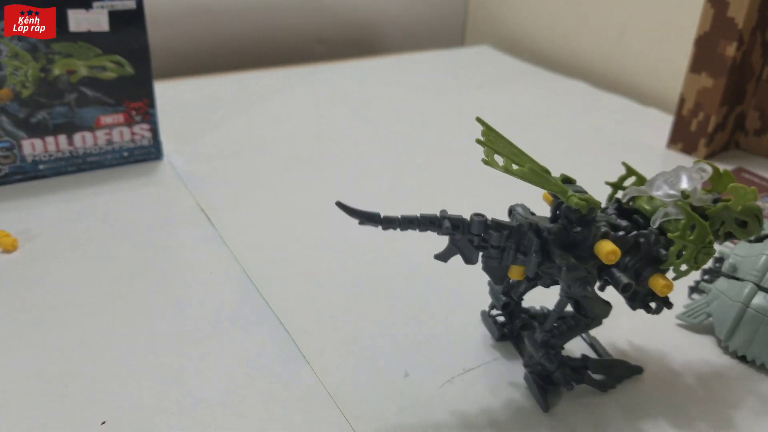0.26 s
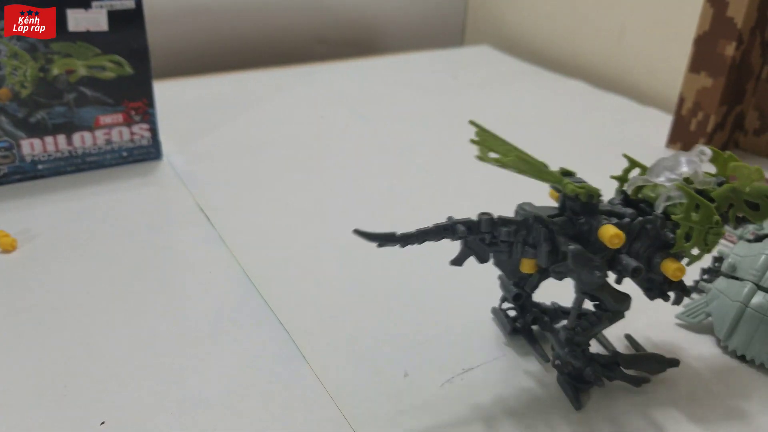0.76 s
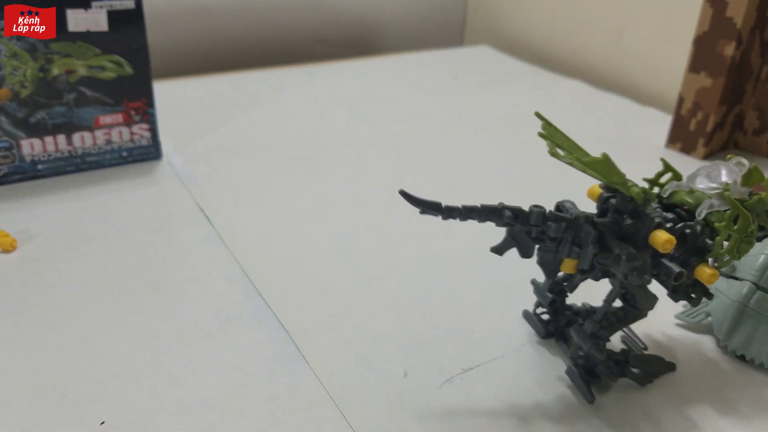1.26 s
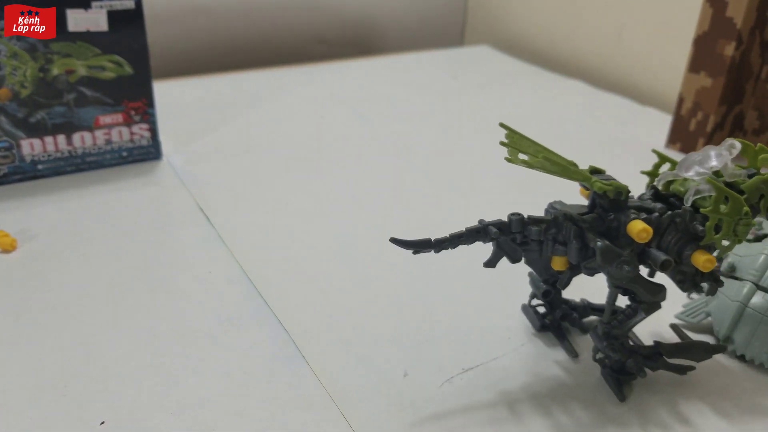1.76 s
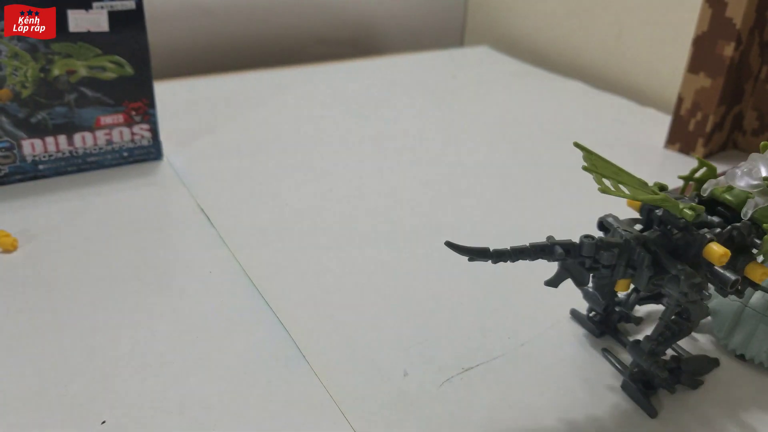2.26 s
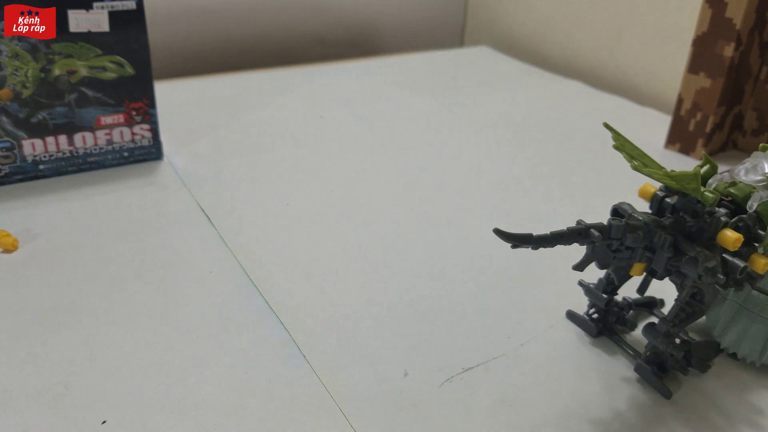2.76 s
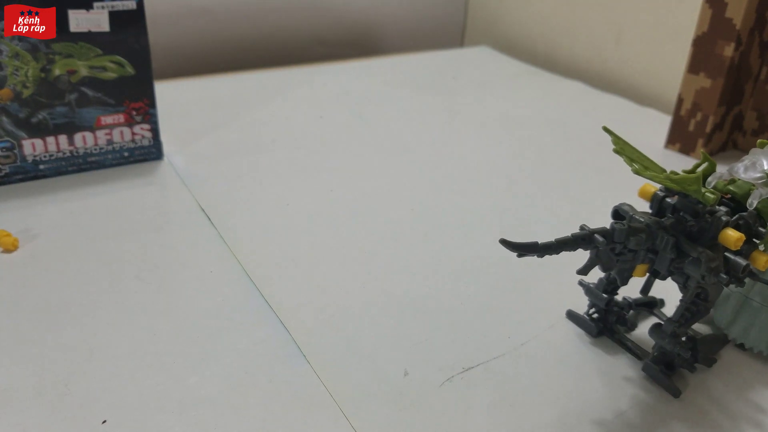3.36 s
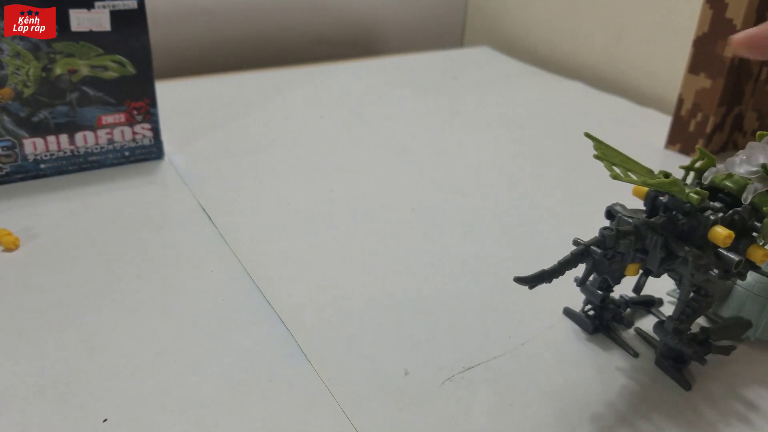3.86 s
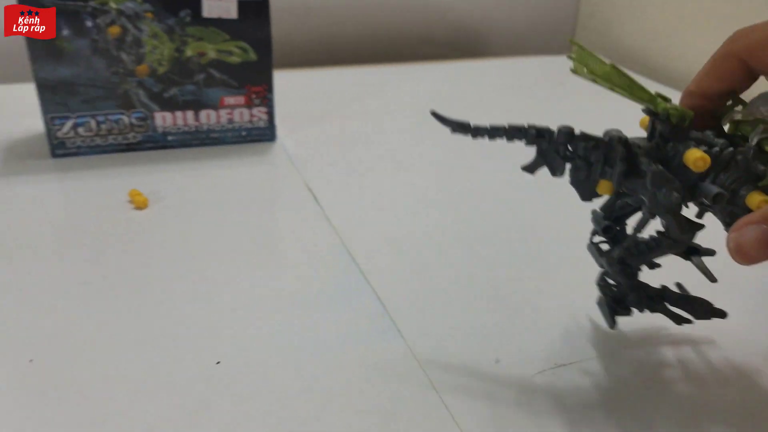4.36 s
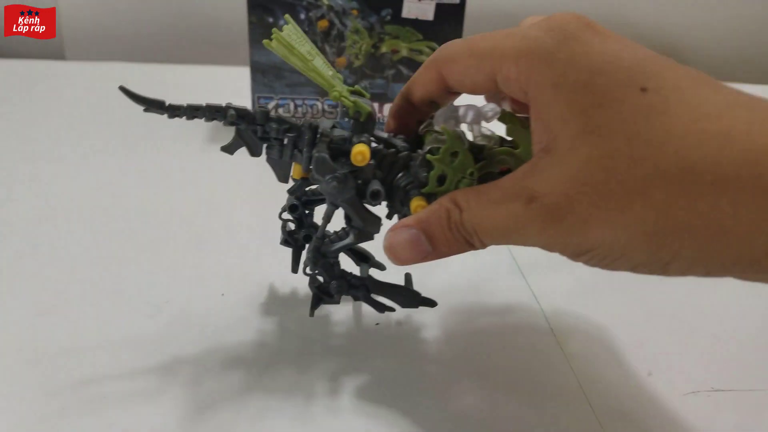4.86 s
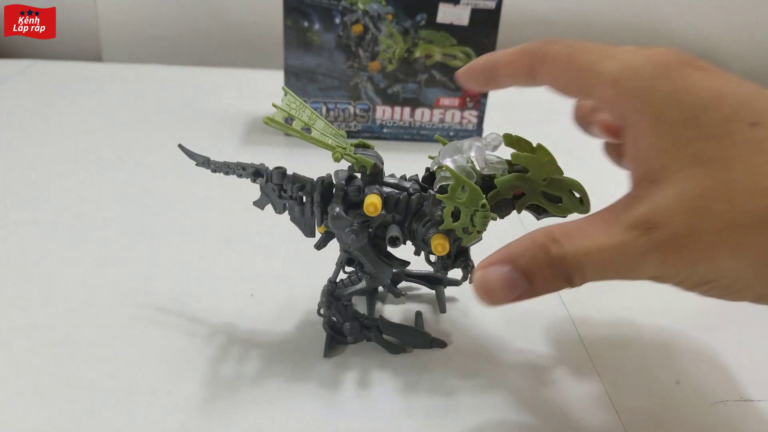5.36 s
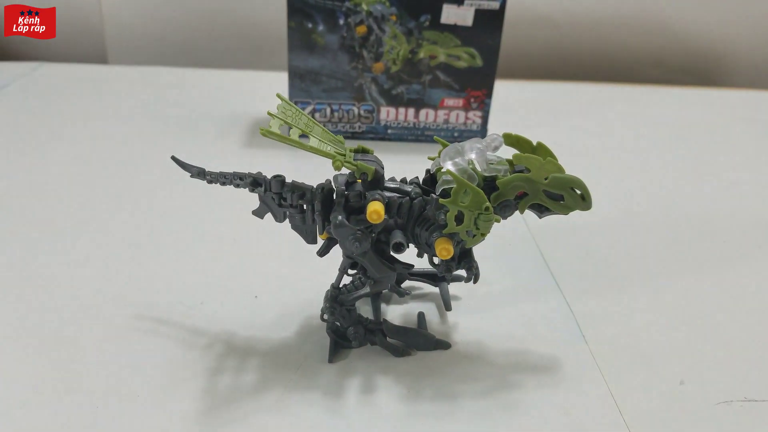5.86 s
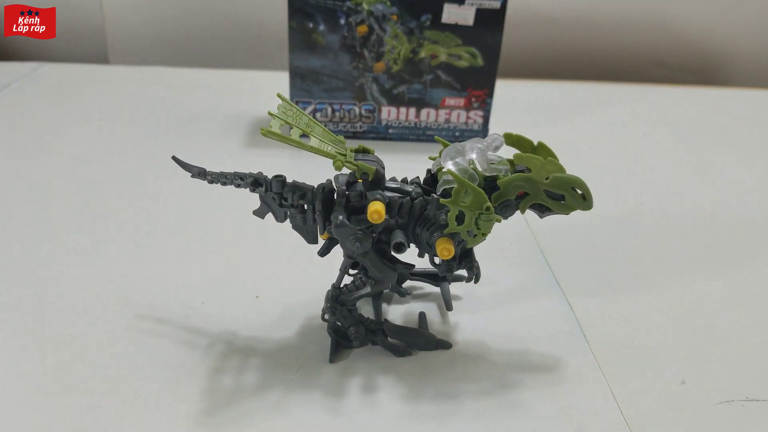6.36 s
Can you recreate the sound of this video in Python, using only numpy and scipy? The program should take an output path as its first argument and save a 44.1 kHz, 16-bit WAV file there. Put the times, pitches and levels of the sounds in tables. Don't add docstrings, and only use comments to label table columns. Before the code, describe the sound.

A wind-up toy whirs and clacks across a tabletop, whirs harder when lifted, then runs down, while low overloaded wind thumps batter the microphone.

```python
import sys
import numpy as np
from scipy import signal
from scipy.fft import rfft, irfft
from scipy.io import wavfile
from scipy.ndimage import uniform_filter1d

SR = 44100
rng = np.random.default_rng(int(sys.argv[2]) if len(sys.argv) > 2 else 0)


def master_out(mix):
    frames = np.transpose(np.atleast_2d(mix))
    ceiling = np.clip(frames, -1, 1)
    pcm = np.round(ceiling * 32767).astype(np.int16)
    wavfile.write(sys.argv[1], SR, pcm)


def nominal_scale(level):
    x = np.asarray(level, float) / 20
    return 10 ** x


N = 291501


def evened(x):
    return x / np.sqrt(np.mean(x ** 2) + 1e-20)


def smooth_noise(count, samples):
    return evened(uniform_filter1d(rng.standard_normal(count), size=samples))


def read(points, hz):
    f, value = np.transpose(points)
    return np.interp(np.log(hz + 1), np.log(f + 1), value)


def colour(points, hz):
    inside = (hz >= points[0][0]) * (hz <= points[-1][0])
    return evened(nominal_scale(read(points, hz)) * inside)[:, None]


def add(mix, start_s, sound):
    part = mix[max(round(start_s * SR), 0):][:len(sound)]
    part += sound[:len(part)]


def bump(t, middle_s, length_s, edge):
    return np.exp(-abs(2 * (t - middle_s) / max(length_s, .01)) ** edge)


def hiss(gain, size, same, lag):
    a, b, c, d = rng.standard_normal((gain.shape[2], gain.shape[1], 4)).T
    same = np.clip(same, -1, 1)
    right, other = a + 1j * b, c + 1j * d
    late = np.exp(-2j * np.pi * np.arange(len(a))[:, None] * lag / size)
    left = same * right * late + np.sqrt(1 - same ** 2) * other
    z = np.array([left, right])
    overlap = size * 3 // 4
    sample = signal.istft(z[1, :, :200], nperseg=size, noverlap=overlap)[1]
    unit = np.sqrt(np.mean(sample ** 2))
    return signal.istft(z * gain, nperseg=size, noverlap=overlap)[1][:, :N] / unit


def floor():
    # f/Hz, level/dB per Hz
    floor_spectrum = [(24, -32), (40, 0), (91, 2.5), (242, -14.5), (956, -14.5), (1700, -22.5),
                      (3250, -32.5), (9290, -53), (12400, -44.5), (14000, -48), (15800, -48)]
    gain = colour(floor_spectrum, np.fft.rfftfreq(1024, 1 / SR)) * np.ones((2, 1, N // 256 + 5))
    return nominal_scale(-34.5) * hiss(gain, size=1024, same=0.13, lag=0.11)


def eddies(axis):
    # middle t/s, length/s, left level/dB, right level/dB
    gusts = [(0.13, 0.37, -12.5, -18), (0.313, 0.089, -41, -10.5), (0.406, 0.12, -14, -26),
             (.58, 0.27, -17.5, -14), (0.804, 0.17, -9, -25), (1.16, 0.45, -17.5, -18.5),
             (1.468, 0.18, -21, -25), (1.709, 0.11, -14, -16.5), (1.935, 0.081, -16.5, -29),
             (2.31, 0.22, -21.5, -18.5), (2.692, 0.093, -12.5, -29), (2.986, 0.2, -25, -14.5),
             (3.114, 0.17, -11.5, -26), (3.373, 0.25, -31, -28), (3.716, 0.18, -17.5, -19),
             (3.858, 0.042, -25, -14), (4.024, 0.22, -12.5, -16.5), (4.306, 0.17, -19.5, -25),
             (4.465, 0.087, -47, -29), (4.728, 0.088, -14.5, -32), (4.905, 0.14, -15.5, -19.5),
             (5.064, 0.033, -14.5, -24), (5.294, 0.027, -16, -37), (5.46, 0.23, -11.5, -24.5),
             (5.673, 0.14, -23.5, -27), (5.97, 0.047, -21.5, -15), (6.281, 0.11, -7.5, -15),
             (6.183, .06, -33, -21.5), (6.474, 0.14, -13.5, -20.5)]
    eddy_hz = (81.8, 163.6)
    eddy_ms = (10, 30)
    per_s, spread_db = 28, 4
    at, size, pitch, span = rng.random((round(N / SR * per_s), 4)).T
    s = (np.arange(len(at)) + at) / per_s
    gust = 1e-4 + sum(nominal_scale(row[2 + axis]) * bump(s, row[0], row[1], edge=3.66) for row in gusts)
    db = 20 * np.log10(gust) + spread_db * (2 * size - 1)
    hz = np.interp(pitch, [0, 1], eddy_hz)
    ms = np.interp(span ** 2, [0, 1], eddy_ms)
    return list(zip(s, db, hz, ms))


def draught(puffs, churn_db, rest_db):
    # f/Hz, level/dB per Hz
    air_spectrum = [(25, -7.5), (60, 9.5), (110, 6.5), (200, 1), (350, -12.5), (700, -29), (1500, -38.5)]
    swings, strength = np.zeros(N), np.zeros(N)
    for (s, db, hz, ms), (phase, glide) in zip(puffs, rng.random((len(puffs), 2))):
        u = np.arange(-3 * ms, 3 * ms, 1000 / SR) / ms
        cycles = hz * ms / 1000 * u
        turns = cycles * (1 + 0.62 * (glide - .5) * u) + phase
        swing = np.cos(2 * np.pi * turns) * np.exp(-2.6 * u ** 2)
        crest = sum(np.cos(2 * np.pi * k * turns + k) / k ** 2.93 for k in range(2, 6))
        crest = crest * np.exp(-(1.1 * cycles) ** 2)
        add(swings, s - 3 * ms / 1000, nominal_scale(db) * (swing + 2.1 * crest))
        slow = np.repeat(np.exp(-2.2 * abs(u)), repeats=2)
        add(strength, s - 6 * ms / 1000, nominal_scale(db) * slow)
    gain = colour(air_spectrum, np.fft.rfftfreq(N, 1 / SR))[:, 0]
    air = evened(irfft(rfft(rng.standard_normal(N)) * gain, N))
    lumps = nominal_scale(4.0 * smooth_noise(N, 1500))
    return swings + air * lumps * (nominal_scale(churn_db) * strength + nominal_scale(rest_db))


def room(x):
    # f/Hz, t60/s
    decay = [(500, 0.11), (5000, 0.1), (15000, 0.025)]
    hz, t, z = signal.stft(rng.standard_normal((SR // 2, 2)).T, SR, nperseg=256)
    fade = nominal_scale(-60 * t / read(decay, hz)[:, None]) * (t > .004)
    tail = signal.istft(z * fade, SR, nperseg=256)[1]
    return signal.fftconvolve(x, tail / np.linalg.norm(tail[0]), axes=1)[:, :N]


def tabletop(x, count=10):
    taps = np.zeros((2, 600))
    at = rng.integers(30, 600, (2, count))
    np.put_along_axis(taps, at, rng.choice([-.2, .2], at.shape), axis=1)
    taps[:, 0] = 1
    return signal.oaconvolve(x, taps / np.linalg.norm(taps[0]), axes=1)[:, :N]


def squeaks():
    # t/s, f/Hz, level/dB
    glides = [
        [(.66, 1255, -45), (.75, 1400, -46), (.85, 1485, -54), (1.0, 1480, -57), (1.3, 1310, -60)],
        [(1.335, 1185, -47), (1.42, 1180, -48), (1.6, 1175, -56)],
        [(2.55, 2030, -51), (2.9, 2015, -51)],
        [(3.01, 1795, -51), (3.09, 1795, -52)],
    ]
    out = np.zeros(N)
    for rows in glides:
        s, hz, db = np.transpose(rows)
        t = np.arange(s[0], s[-1], 1 / SR)
        waver, grip = smooth_noise(len(t), 700), smooth_noise(len(t), 700)
        tone = np.sin(2 * np.pi * np.cumsum(np.interp(t, s, hz) * (1 + .007 * waver)) / SR)
        level = nominal_scale(np.interp(t, s, db) + 2.5 * grip + 9)
        add(out, s[0], level * tone * signal.windows.tukey(len(t), .06))
    return out


def knocks():
    # t/s, peak level/dB, ring f/Hz
    taps = [
        (0.1364, -10.5, 1170),
        (0.6582, -7, 1170),
        (0.9894, -1.5, 1416),
        (1.6571, -9.5, 970),
        (2.3366, -9, 1380),
        (2.3894, -2.5, 1820),
        (2.5416, -19, 2940),
        (3.4517, -14, 3060),
        (3.482, -7.5, 3150),
    ]
    # t/s, peak level/dB
    ticks = [
        (6.0397, -44),
        (6.0841, -47),
        (6.133, -30),
    ]
    out, t = np.zeros(N), np.arange(1500) / SR
    for s, db, hz in taps:
        ring = np.sin(2 * np.pi * hz * t) * nominal_scale(-60 * t / .015)
        crack = signal.lfilter([.3], [1, -.7], rng.standard_normal(len(t))) * nominal_scale(-60 * t / 0.2)
        add(out, s, nominal_scale(db - 19.0) * (ring + 1.44 * crack))
    for s, db in ticks:
        crack = np.diff(rng.standard_normal(len(t) + 1)) * nominal_scale(-60 * t / .006)
        add(out, s, nominal_scale(db - 6) * crack)
    return out


def drive_db(t):
    # t/s, level/dB
    spring = [(0.0, -10), (1.34, -11.5), (2.502, -14), (2.619, -20), (3.053, -20), (3.49, -24),
              (3.686, -28), (3.89, -14), (4.14, -13), (4.29, -8), (4.492, -7), (4.709, -10.5), (4.99, -10),
              (5.353, -11), (5.48, -23), (5.582, -47), (5.907, -62.5), (6.56, -61.5)]
    # middle t/s, length/s, change/dB
    catches = [(0.06, 0.08, -4.5), (0.317, 0.17, -6), (0.535, 0.21, -10), (0.515, 0.038, -10),
               (0.787, 0.099, -6), (1.068, 0.041, -6.5), (1.385, 0.091, -7.5), (1.511, 0.11, -20),
               (1.689, 0.13, -9.0), (1.9, 0.13, -8.5), (2.196, 0.051, -8), (2.254, 0.067, -5),
               (2.503, 0.046, -2), (2.542, 0.02, 6), (3.51, 0.038, -3.5), (3.78, 0.025, 0.5),
               (3.847, 0.039, 8.5), (3.898, 0.15, -11.5), (3.978, 0.032, -14.5), (4.029, 0.1, -10),
               (4.188, 0.067, -13), (5.122, 0.12, -18.5), (5.13, 0.019, -4.4), (5.235, 0.082, -4),
               (5.399, 0.074, -9), (6.202, 0.078, 24.5)]
    pull_db = np.interp(t, *np.transpose(spring))
    return pull_db + sum(db * bump(t, s, length_s, edge=3.66) for s, length_s, db in catches)


def mesh(clock):
    # t/s, contact rate/Hz, clearness 0-1
    contacts = [(0, 330, .55), (.8, 280, .75), (2.4, 290, .7), (2.7, 250, .25), (3.8, 250, .25),
                (4.25, 390, .5), (5.0, 385, .55), (5.2, 325, .55)]
    s, per_s, clear = np.transpose(contacts)
    jitter = 1 + .07 * smooth_noise(N, 300)
    stride = 1 + .16 * smooth_noise(N, round(.12 * SR))
    turns = np.cumsum(np.interp(clock, s, per_s) * jitter * stride) / SR
    size = nominal_scale(1.8 * rng.standard_normal(N))[turns.astype(int)]
    burst = size * np.exp(-(((turns % 1) - .35) / .17) ** 2)
    share = np.interp(clock, s, clear) * np.array([[.35], [.7]])
    return np.sqrt(1 - share + share * evened(burst) ** 2)


def gears(patchy_db=2.6):
    # f/Hz, level/dB per Hz
    teeth_walking = [(5290, -43), (9000, -15), (10400, -5.5), (12400, 2.5), (13700, 2.5), (15000, 0),
                     (15800, 3.5)]
    teeth_pushing = [(5290, -22), (9000, -9.5), (11000, -4.5), (12500, 0), (13700, -7), (15800, -6)]
    teeth_held = [(5290, -38), (9000, -9.5), (10500, -3.5), (11100, 3), (12800, 2), (14000, 2),
                  (15000, 10.5), (15800, 4)]
    # f/Hz, level/dB per Hz
    shell_free = [(3100, -16), (3600, 0), (4100, -9), (4450, -1), (6250, 0), (9200, -3), (10500, -5),
                  (13000, -25)]
    shell_pushing = [(2200, -14), (2900, 2.5), (3500, -3), (4800, -5), (6000, -0.5), (9200, 1.5),
                     (10500, -33), (13000, -24)]
    rasp = [(300, -22), (700, -3), (1500, 0), (3200, 1), (3500, -25)]
    # f/Hz, -1 to 1
    same_walking = [(1000, .2), (2600, 0), (3650, -.93), (4300, -.4), (5500, -.55), (7500, -.3), (8500, .3),
                    (12000, .1)]
    same_pushing = [(1000, -.1), (2200, -.95), (2800, -.6), (3300, -.4), (4000, .1), (6000, -.4),
                    (9000, .4), (12000, 0)]
    same_held = [(1500, -.4), (2800, .6), (3600, -.2), (4200, .2), (5500, -.4), (11500, .4), (15000, .3)]
    # t/s, shell level/dB, rasp level/dB, left-right of teeth/dB
    facing = [(0.05, -5, -16, -4), (1.1, -8, -25.5, -5), (2.4, -5.5, -20.5, -6), (2.7, -4.5, -20.5, -3.5),
              (3.7, -4.5, -16, -4), (4.12, -5.5, -28, -4.5), (4.5, -9, -19.5, -9.5),
              (4.8, -6.5, -21.5, 1.5), (5.45, -10, -30, 0), (6.2, 0.5, -11, -7.5)]
    hop, shell_follows, rasp_follows, full_db = 64, 0.9, 0.67, -12
    t, hz = np.arange(N // hop + 5) * hop / SR, np.fft.rfftfreq(4 * hop, 1 / SR)

    s, *columns = np.transpose(facing)
    shell_db, rasp_db, pan_db = (np.interp(t, s, c) for c in columns)
    slack_db = np.clip(full_db - drive_db(t), -6, 30)
    shell_db = shell_db + (1 - shell_follows) * slack_db
    rasp_db = rasp_db + (1 - rasp_follows) * slack_db

    held = np.clip((t - 4.12) / 0.28, 0, 1)
    pushing = bump(t, middle_s=3.13, length_s=1.21, edge=12)
    walking = 1 - held - pushing
    patches = uniform_filter1d(rng.standard_normal((len(t), len(hz))).T, size=120)
    patches = nominal_scale(patchy_db * evened(patches))
    likeness = ((walking, same_walking), (pushing, same_pushing), (held, same_held))
    same = sum(share * read(table, hz)[:, None] for share, table in likeness)
    sway = .5 * smooth_noise(len(t), 70)

    side = np.array([1, -1])[:, None, None]
    teeth = walking * colour(teeth_walking, hz) + pushing * colour(teeth_pushing, hz)
    teeth = teeth + held * colour(teeth_held, hz)
    teeth = teeth * nominal_scale(side * pan_db / 2 - 1.23)
    shell = (1 - pushing) * colour(shell_free, hz) + pushing * colour(shell_pushing, hz)
    body = np.hypot(shell * nominal_scale(shell_db - 1.5), colour(rasp, hz) * nominal_scale(rasp_db - 4.0)) * abs(side)
    teeth = hiss(teeth * patches, size=4 * hop, same=same, lag=sway)
    body = hiss(body * patches, size=4 * hop, same=same, lag=sway)
    clock = np.arange(N) / SR
    return (teeth * mesh(clock) + body) * nominal_scale(drive_db(clock))


def scene():
    # t/s, peak level/dB, swing f/Hz, length/ms
    puffs_left = [(0.417, -8, 89.5, 9.7), (0.463, -2, 169, 19), (0.655, -1.2, 119, 19),
                  (0.764, -8.5, 208, 7.7), (0.796, -2, 123, 8.4), (0.974, -7, 122, 6.2),
                  (1.039, -7.5, 157, 20), (1.061, 2.5, 144, 4.9), (1.109, -9.5, 172, 21),
                  (1.164, -4, 224, 13), (1.205, -4.5, 122, 35), (1.271, 3, 141, 20.4),
                  (2.247, -4.5, 127, 13.6), (2.641, -3.5, 113, 20), (2.871, -0.5, 194, 26.6),
                  (2.913, 3, 139, 9.3), (3.048, 2, 134, 3), (3.092, -13, 140, 11), (3.478, -4, 170, 9.4),
                  (3.618, -3.5, 107, 22), (3.896, -4.5, 121, 13), (3.995, 6, 165.4, 7.2),
                  (4.049, 7, 125, 4), (4.304, -7, 166, 30), (4.834, 0.5, 122, 15.5), (4.888, 2.5, 182, 4.6),
                  (6.082, -10, 170, 15), (6.226, -2, 168, 12.5), (6.391, 6.5, 114, 16.4),
                  (6.466, -4, 146, 4)]
    puffs_right = [(0.028, -9, 124, 8.4), (0.434, -14, 156, 9.4), (0.692, -6, 155, 8.5),
                   (0.73, -18, 109, 9.1), (1.181, -16, 148, 11), (1.375, -14, 132, 21),
                   (1.412, -5.5, 151, 9.1), (1.499, -12.5, 159, 20), (1.536, -15.5, 109, 45),
                   (1.881, -7.5, 125, 18.5), (2.207, -16.5, 217, 9.6), (2.766, -13, 91.5, 34),
                   (2.856, -15, 64.6, 20), (3.965, -20, 102, 17), (4.019, -5.5, 137, 13),
                   (4.378, -15, 105, 11)]
    toy = tabletop(gears() + knocks()) + squeaks()
    left = draught(puffs_left + eddies(axis=0), churn_db=-4.0, rest_db=-43.5)
    right = draught(puffs_right + eddies(axis=1), churn_db=-10.5, rest_db=-43.0)
    echo = nominal_scale(-12) * room(toy)
    return toy + echo + np.array([left, right]) + floor()


def band_limit(x):
    return signal.sosfilt(signal.butter(12, 15960, fs=SR, output="sos"), x)


def record(dry):
    lowpass = signal.firwin(511, 15850, window=("kaiser", 9), fs=SR)
    limited = signal.oaconvolve(dry, lowpass[None], "same")
    squeezed = limited / (1 + limited ** 12) ** (1 / 12)
    return band_limit(squeezed)


dry = scene()
out = record(dry)
master_out(out)
```